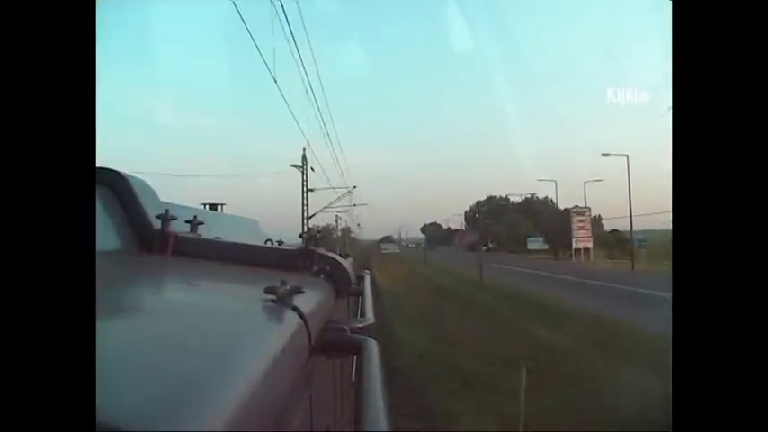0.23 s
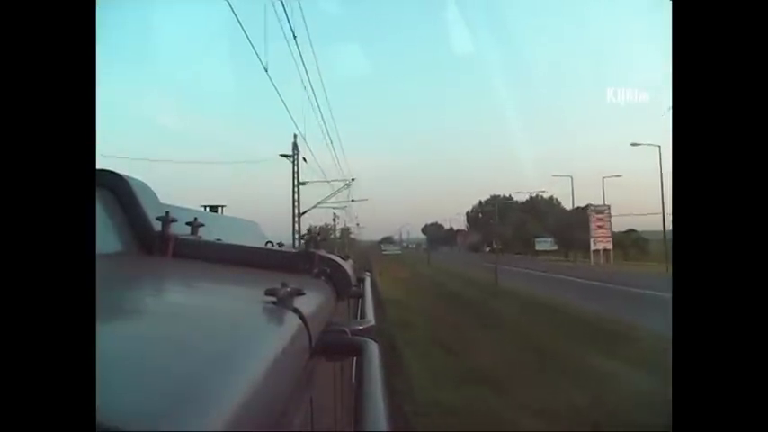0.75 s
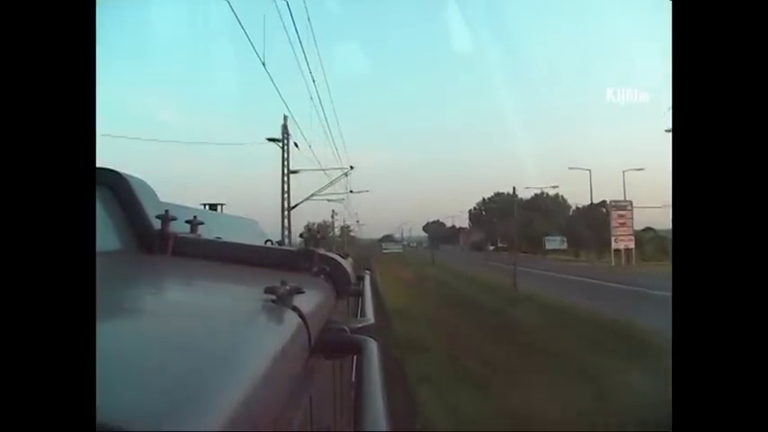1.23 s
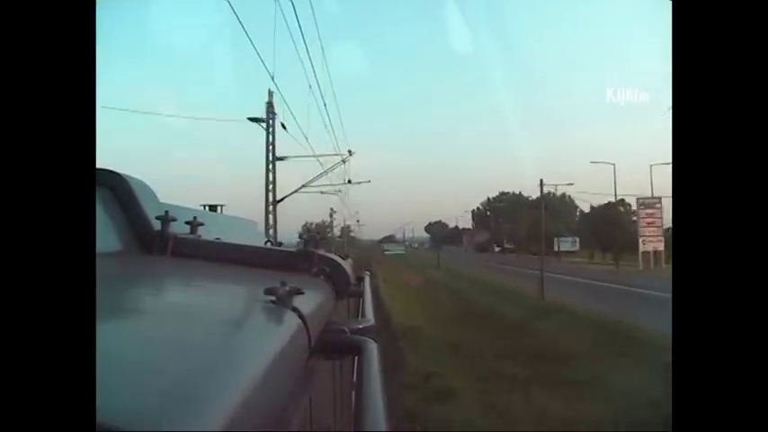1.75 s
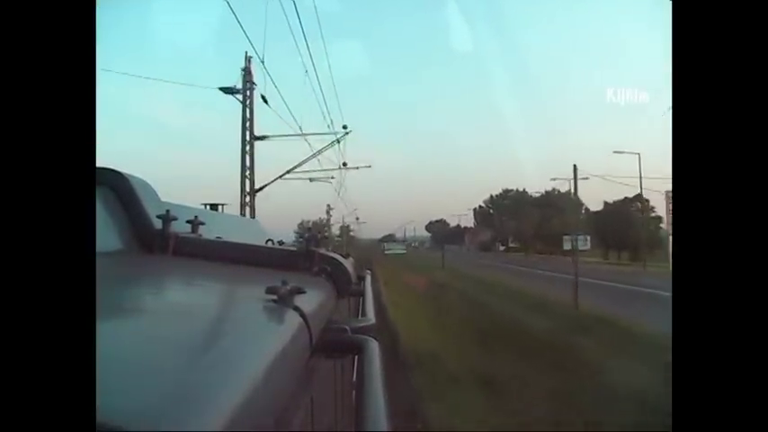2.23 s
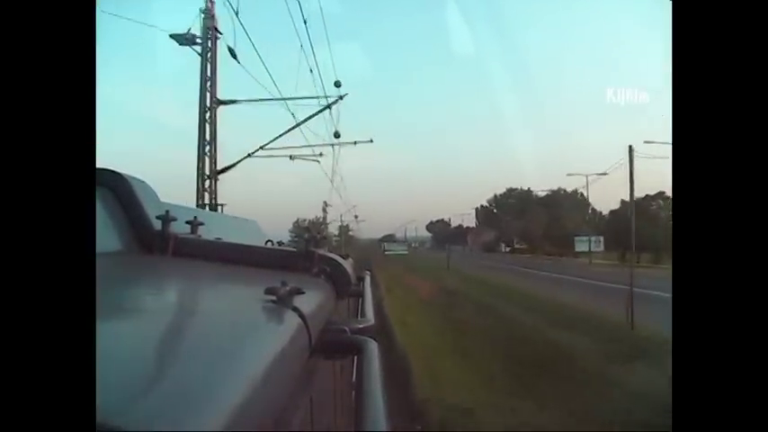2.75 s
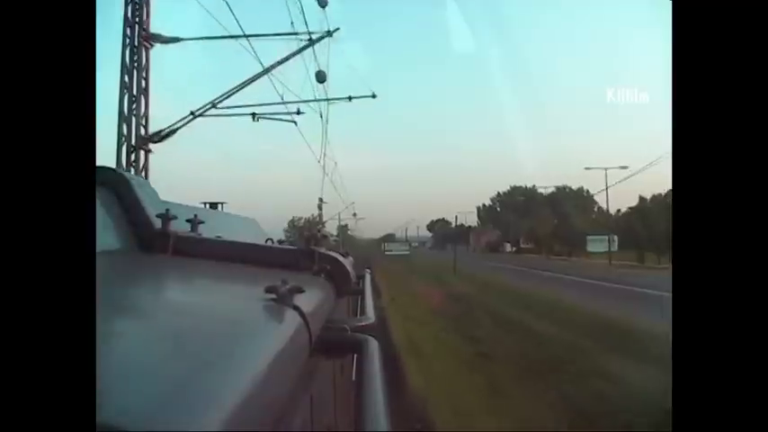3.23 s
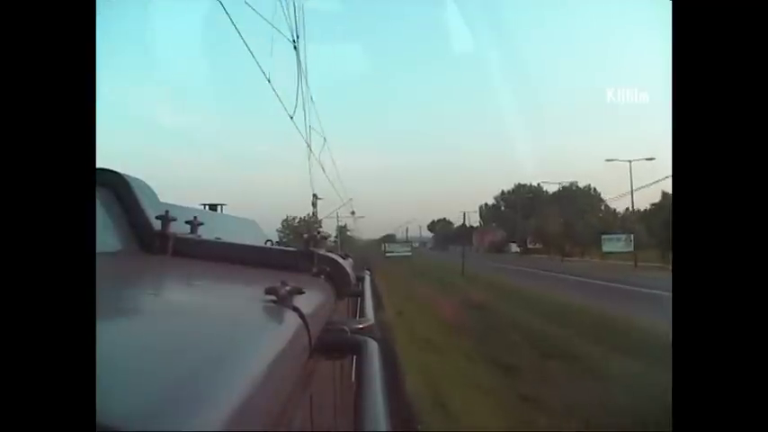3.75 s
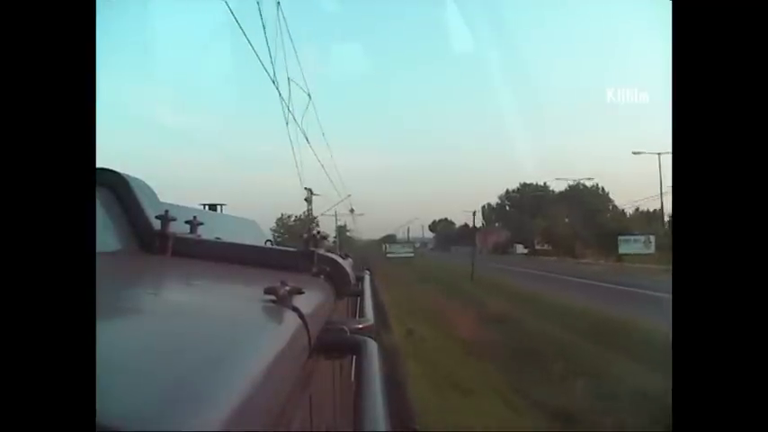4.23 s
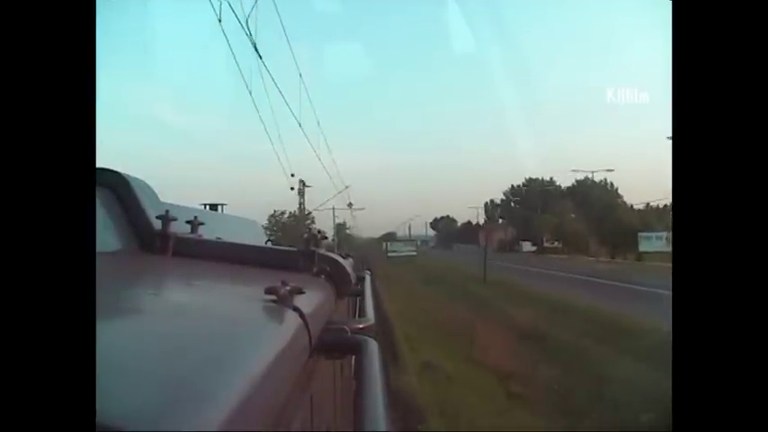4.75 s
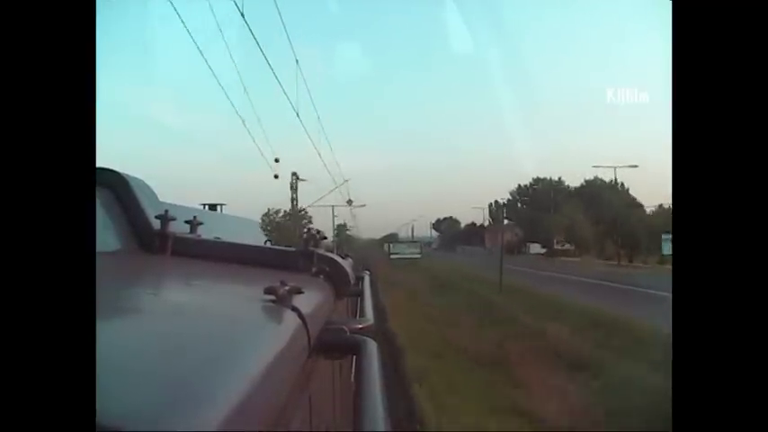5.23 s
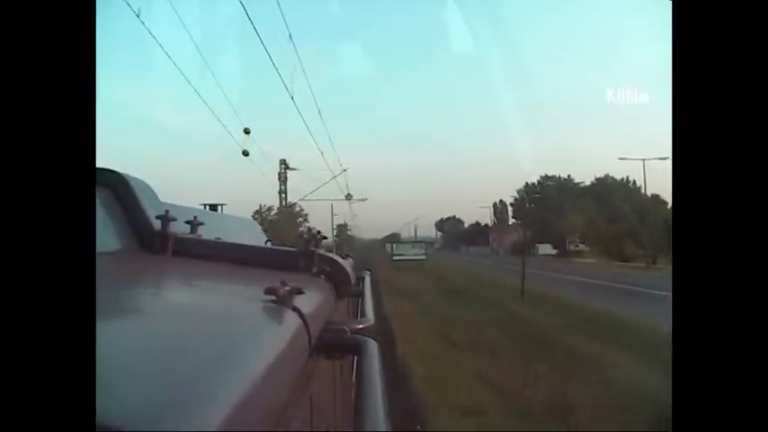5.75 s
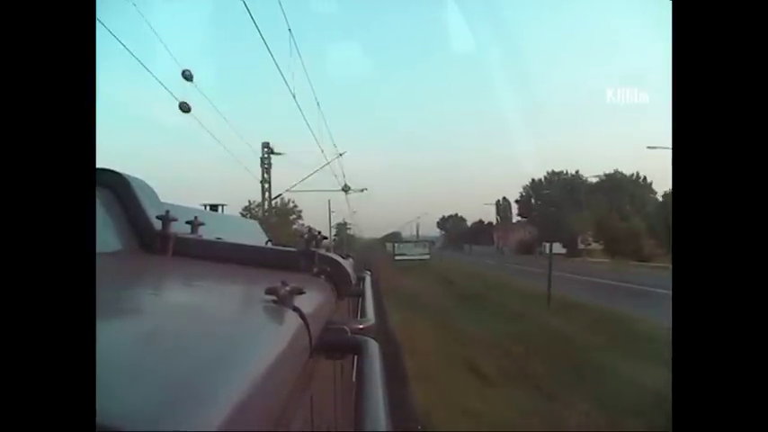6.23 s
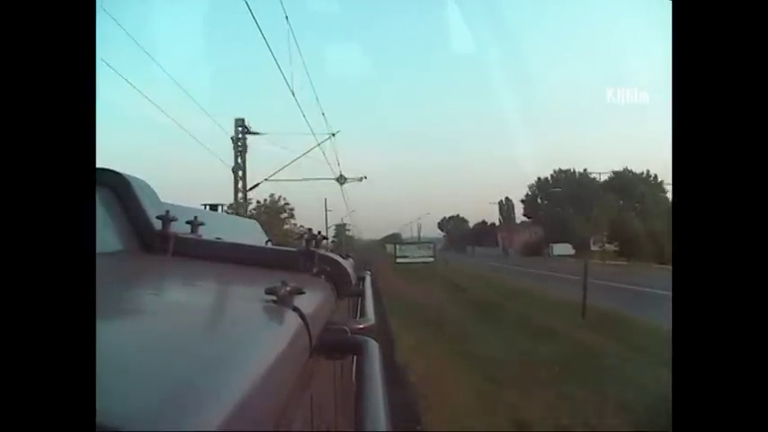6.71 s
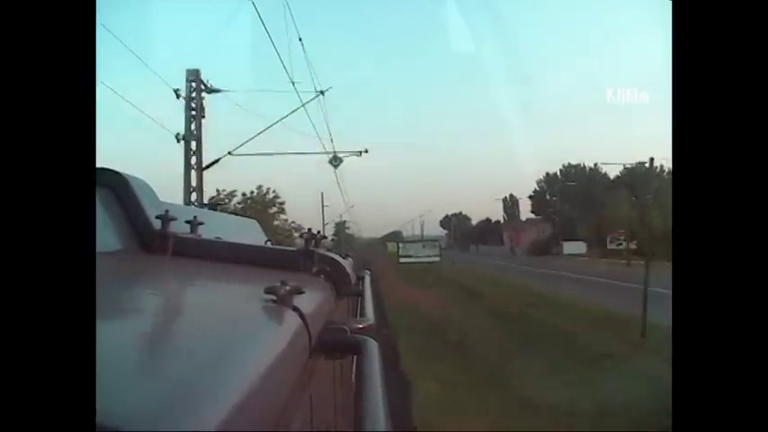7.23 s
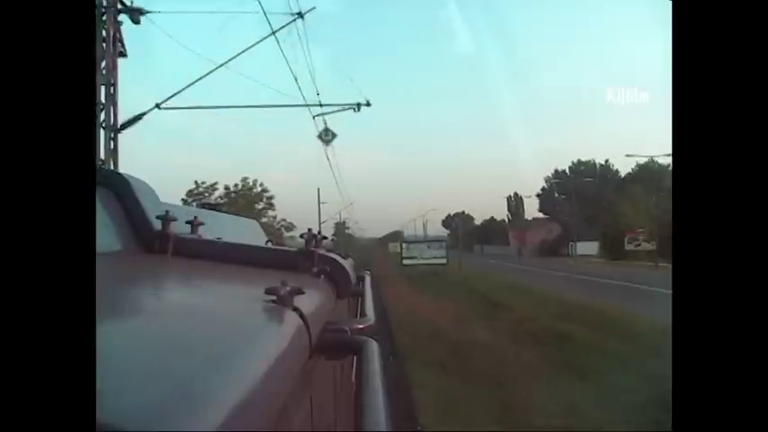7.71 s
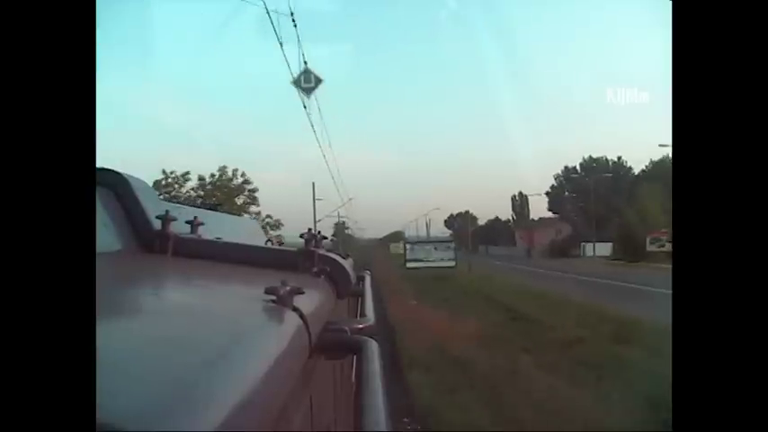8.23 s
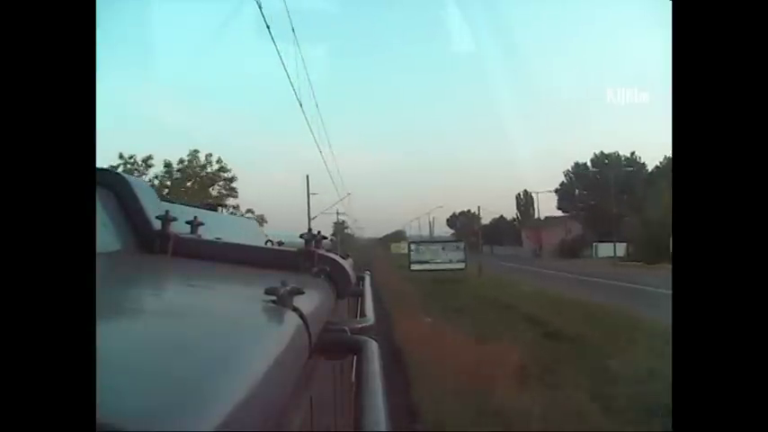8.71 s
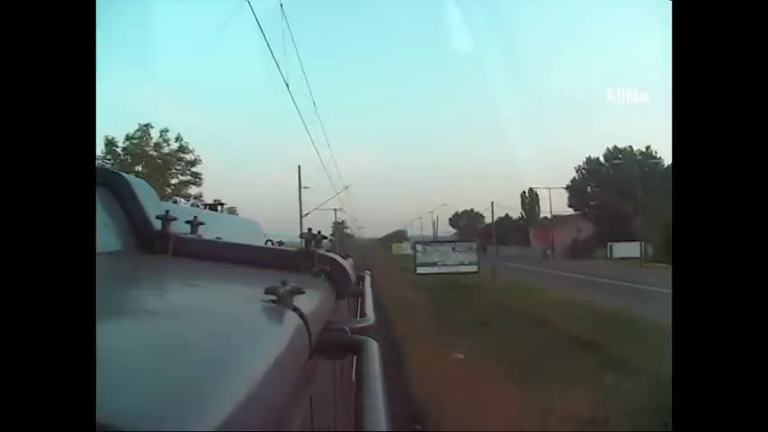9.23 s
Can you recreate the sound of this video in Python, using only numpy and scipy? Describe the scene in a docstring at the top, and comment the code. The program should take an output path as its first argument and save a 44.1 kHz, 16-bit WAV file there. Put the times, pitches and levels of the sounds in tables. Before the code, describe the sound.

A locomotive runs along the track, heard close up from the cab. Its engine drones steadily under a high, wavering generator whine, while a gear whine creeps upward as the train gathers speed. Deep rumble and rolling hiss continue throughout. From about a third of the way in, the wheels patter and thud more heavily on the rails, and loose fittings give faint, brief rattles.

```python
"""A locomotive gathers speed

From an open cab window, a diesel engine drones and its generator whines. Both follow
the engine's shaft, which runs too fast for a moment and then settles. The gears that
drive the wheels whine higher as the train speeds up. Wheels thud on the rails over
rumble, drumming, rolling hiss and cooling air, and loose fittings rattle now and then."""
import sys
import numpy as np
from scipy import signal
from scipy.fft import rfft, irfft, next_fast_len
from scipy.io import wavfile

SR = 44100
rng = np.random.default_rng(int(sys.argv[2]) if len(sys.argv) > 2 else 0)


def generate_wav(signal):
    """Clip the signal to [-1, 1] and save it as 16-bit WAV at the path in sys.argv[1]."""
    frames = np.transpose(np.atleast_2d(signal))
    scaled = np.clip(frames, -1, 1) * 32767
    pcm = np.round(scaled).astype(np.int16)
    wavfile.write(sys.argv[1], SR, pcm)


N = 417627
MARGIN = 2000  # spare samples at each end, so the sound starts and stops in full flow
SAMPLES = np.arange(-MARGIN, N + MARGIN)
STEPS = np.arange(-MARGIN, N + MARGIN + 100, 100)  # slow changes need only every 100th sample
STEP_S = STEPS / SR
FFT_SIZE = next_fast_len(N + 8192)
BIN_HZ = np.maximum(np.arange(FFT_SIZE // 2 + 1) * SR / FFT_SIZE, 1)


def from_db(db):
    """Turn decibels into a number to multiply by."""
    return 10 ** (np.asarray(db) / 20)


def per_sample(slow):
    """Fill in a slow curve so that every sample has a value."""
    return np.interp(SAMPLES, STEPS, slow)


def over_time(rows):
    """Join (time, value) points into a slow curve."""
    times_s, values = np.transpose(rows)
    return np.interp(STEP_S, times_s, values)


def over_pitch(rows):
    """Join (pitch, values...) points into one curve over pitch for each value column."""
    pitch_hz, *columns = np.transpose(rows)
    return [np.interp(np.log(BIN_HZ), np.log(pitch_hz), column) for column in columns]


def bumps(place, rows):
    """Add up smooth hills and dips along time or pitch."""
    return sum(height * np.exp(-(2 * (place - centre) / width) ** 2) for centre, width, height in rows)


def drift(rate_hz):
    """A smooth random wander, usually between about -1 and 1."""
    pole = np.exp(-200 * np.pi * rate_hz / SR)
    noise = rng.standard_normal(len(STEPS) + 1000)
    slow = signal.lfilter([1], [1, -2 * pole, pole * pole], noise)[1000:]
    return (slow - slow.mean()) / slow.std()


def tone(cycles, level_db, shift_cycles):
    """A pure tone that follows a running count of cycles."""
    return per_sample(np.sqrt(2) * from_db(level_db)) * np.sin(2 * np.pi * (cycles + shift_cycles))


def shaft_speed():
    """Shaft turns per second: the governor (speed control) overshoots, then sags to its setting."""
    set_speed, settle_s = 12.501, 1.12
    lurch_fade_s, lurch_delay_s, lurch_period_s = .3015, .244, 2.414
    excess = 1.098 * np.exp(-STEP_S / settle_s)
    swing = np.cos(2 * np.pi * (STEP_S - lurch_delay_s) / lurch_period_s)
    lurch = 1.25 * np.exp(-STEP_S / lurch_fade_s) * swing
    return set_speed + excess - lurch


# Engine tones, low from firing, higher from valves and generator: cycles_per_turn, level_db
ENGINE_TONES = [(3.0, -44.2), (4.5, -26.8), (5.0, -34.7), (6.0, -20.5), (9.0, -30.1), (11.0, -32.0),
                (13.0, -28.8), (14.0, -29.8), (15.0, -29.1), (16.0, -29.5), (19.0, -32.2), (20.0, -34.4),
                (24.0, -34.4), (32.0, -42.8), (35.0, -42.8), (36.0, -42.3), (38.0, -45.9), (46.0, -44.1),
                (48.0, -40.8), (52.0, -40.2), (54.0, -45.9), (55.0, -43.5), (56.0, -46.3), (59.0, -46.1),
                (60.0, -48.3), (70.0, -50.4), (96.0, -49.1), (117.0, -54.3), (124.0, -51.4), (154, -49)]


def engine_drone(turns):
    """Tones locked to the turning shaft; the low firing tones hold steadier than the high ones."""
    drone = np.zeros(len(turns))
    for per_turn, level_db in ENGINE_TONES:
        waver_db = 1 if per_turn < 13 else 2
        drone += tone(per_turn * turns, level_db + waver_db * drift(1), rng.random())
    return drone


# Narrow bands where the cab boosts or dulls a gliding whine: pitch_hz, width_hz, boost_db
CAB_BANDS = [(338, 5, 2), (961, 2.5, -4), (966, 4, 1.5), (977, 3, -9), (981, 2, 0), (985, 3, -12),
             (991.5, 4, -10), (995.5, 2.5, -14), (1278, 4, 4), (1282, 4, 4.5), (1289, 6, -12),
             (1296, 8, -11), (1300, 5, -7), (1304, 3, -1), (1313, 10, 1), (1327, 8, -3), (1360, 12, -8),
             (1380, 14, 4), (1792, 30, 7), (1928, 5, 8), (1950, 9, 10), (1970, 14, 11), (1986, 16, 18),
             (2002, 8, 10), (2258, 32, 18), (3403, 36, 17)]
# The generator's slot whine, its overtones and fainter whistles: cycles_per_turn
SLOT_TONES = (130, 134, 138, 142, 146, 272, 276, 280, 284, 366.1, 414, 418, 406, 410, 430, 434, 442, 150)
# How loud each slot tone usually is: level_db
SLOT_LEVELS = (-45, -40, -36.5, -36, -42.5, -59.5, -51, -53, -52, -63, -68, -68, -76, -72, -78, -78, -78,
               -49)
# When slot tones swell or sink, one list for each tone: middle_s, length_s, boost_db
SLOT_CHANGES = [
    [(1.2, .6, 3), (4.9, 0.73, 7.5), (6.2, 0.6, 10), (7.6, .8, 9), (9.0, 0.76, 9.5)],
    [(1.9, 0.29, 12), (3.9, 0.95, 11), (4.9, 0.77, 7.5), (7.5, 0.42, 10)],
    [(.3, 0.19, 8), (.75, 0.31, 4), (1.3, 0.31, 9), (2, 0.32, 4), (4.3, 1.1, 5), (5.4, 1.4, -2),
     (7.1, 1, 4.5), (8.3, 0.9, 8), (8.8, 0.34, -19), (9.2, 0.35, 5)],
    [(.05, 0.24, 2), (1.2, 0.6, 3.5), (4.5, 0.53, -8), (8.4, 0.81, -7), (9.2, 0.39, 6.5)],
    [(0, 0.23, 12.5), (1, 1, 2), (2.4, 1.1, 8), (3.9, 1.1, 6), (4.8, .5, -4), (6, 0.71, -8), (8.1, .9, 8.5)],
    [(1.7, .5, 11), (3.4, .5, 7), (7.4, 0.4, -4.5)],
    [(.25, 0.73, 8), (2.8, 0.95, 2), (4.6, 1, 7), (7.5, .6, 3), (8.5, 0.63, 3.5)],
    [(.1, 0.33, 8), (3, 0.92, -6), (8.5, 0.46, 3), (9.2, 0.47, 11.5)],
    [(.5, 1.5, -8), (5.5, 0.55, -4), (6.8, 0.46, -10), (9, 0.55, 7.5)],
    [(3.6, 0.62, 8), (4.4, 0.62, -6), (6.4, 3.3, 11), (8.6, 1, -8.5), (9.3, 0.42, 10)],
    [(4.5, .8, -11), (7.5, 4, 10)],
    [(.7, .6, 9), (2.1, .6, 9), (4.4, .8, 9), (7.1, 0.95, 6)],
    [(1.9, .4, 10), (8.2, 2.5, 11)],
    [(.7, .4, 11), (1.5, .4, 12), (4, 1.5, 8)],
    [(1.17, .25, 22), (1.75, 0.22, 15)],
    [(.45, 0.27, 22), (.72, 0.22, 12)],
    [(.8, .25, 20)],
    [(.6, 1.1, 0), (3.6, 1.6, 3.5), (7.2, .6, 5), (8.5, 0.88, 7)],
]
# When overtones in the housing swell or sink together: middle_s, length_s, boost_db
HOUSING_CHANGES = [(0.097, 0.44, 0), (.65, 0.65, -6.5), (1.95, 0.29, -6), (3.0, 2, 6), (3.9, .2, 0),
                   (5.2, .3, 1), (7.3, .25, -5)]
# Side tones about an octave above the slot whine: cycles_per_turn, level_db
HOUSING_TONES = [(264, -54), (268, -50), (288, -53), (292, -62), (300, -54)]


def generator_whine(turns, turns_per_s):
    """The generator's slots make close tones, loosely in step, that buzz four times a turn."""
    whine = np.zeros(len(turns))
    together_db = bumps(STEP_S, HOUSING_CHANGES)
    for per_turn, usual_db, swells in zip(SLOT_TONES, SLOT_LEVELS, SLOT_CHANGES):
        level_db = usual_db + bumps(per_turn * turns_per_s, CAB_BANDS) + bumps(STEP_S, swells)
        if 275 < per_turn < 300:
            level_db += together_db
        waver_db = 1.8 if per_turn > 300 else 1.7 if per_turn > 200 else .9
        level_db += waver_db * drift(4)
        whine += tone(per_turn * turns, level_db, shift_cycles=per_sample(.12 * drift(.32)))
    housing_hz, width_hz = 3505, 300  # side tones are loudest where the housing rings
    for per_turn, usual_db in HOUSING_TONES:
        off_centre = 2 * (per_turn * turns_per_s - housing_hz) / width_hz
        housing_db = together_db - 10 * np.log10(1 + off_centre ** 4)
        whine += tone(per_turn * turns, usual_db - 4 + housing_db + 2.5 * drift(.92), rng.random())
    return whine


# Low hums and thin generator and blower whistles: cycles_per_turn, start_db, end_db
LOAD_TONES = [(12, -20.5, -24.5), (21, -35, -24.5), (29, -41, -32), (27, -30, -28.5), (64, -45, -40),
              (68, -43, -40), (140, -58, -46), (557.3, -70, -78), (594.7, -70, -64), (637.1, -65, -76),
              (661, -68, -68), (689.8, -69, -72)]


def hums_and_whistles(turns, turns_per_s):
    """Tones that follow the shaft and swell or fade as the engine takes up the load."""
    sound = np.zeros(len(turns))
    for per_turn, start_db, end_db in LOAD_TONES:
        level_db = np.linspace(start_db, end_db, len(STEPS)) + bumps(per_turn * turns_per_s, CAB_BANDS)
        waver_db = .9 if per_turn < 30 else 2.8
        sound += tone(per_turn * turns, level_db + waver_db * drift(.8), rng.random())
    return sound


# The main gear tones: cycles_per_tooth
GEAR_TONES = (.75366, 1, 1.50754, 1.70045)
# How loud each main gear tone usually is: level_db
GEAR_LEVELS = (-30.5, -27.5, -50.5, -57.5)
# Fainter gear tones: cycles_per_tooth, start_db, end_db
FAINT_GEAR_TONES = [(.7275, -50, -50), (.7796, -44, -43), (1.0290, -42, -54), (1.0492, -42, -44),
                    (1.457, -52, -52), (1.9997, -57, -57), (2.0985, -60, -60), (2.2610, -61, -61)]


def gear_whine():
    """Gear teeth meet faster as the train speeds up, so their whine slowly climbs."""
    start_hz, climb_hz_per_s = 1271.4, 5.964
    tooth_hz = start_hz + climb_hz_per_s * STEP_S
    teeth = np.cumsum(per_sample(tooth_hz + .6 * drift(3))) / SR
    levels_db = [usual_db + bumps(per_tooth * tooth_hz, CAB_BANDS)
                 for per_tooth, usual_db in zip(GEAR_TONES, GEAR_LEVELS)]
    whine = np.zeros(len(teeth))
    for per_tooth, level_db in zip(GEAR_TONES, levels_db):
        waver_db = 1.2 if per_tooth < 1 else .8
        whine += tone(per_tooth * teeth, level_db + waver_db * drift(5), rng.random())
    whine += tone(3 * teeth, levels_db[2] - 15, rng.random())  # grows with the third main tone
    for per_tooth, start_db, end_db in FAINT_GEAR_TONES:
        level_db = np.linspace(start_db, end_db, len(STEPS)) + 1
        level_db += bumps(per_tooth * tooth_hz, CAB_BANDS)
        whine += tone(per_tooth * teeth, level_db + 2.5 * drift(.27), rng.random())
    return whine


# How loud the patter of the wheels is: time_s, level_db
PATTER_LEVELS = [(0, -37), (.7, -34), (1.4, -44), (2.3, -30), (3.2, -27), (3.7, -19.5), (4.8, -24),
                 (6.3, -19), (7.6, -24.5), (9.47, -27.5)]
# Heavier single blows of a wheel on the rail: start_s, strength_db
WHEEL_JOLTS = [(3.593, -15), (4.017, -15), (4.545, -21), (4.952, -21), (5.234, -18), (5.538, -18),
               (6.094, -16.5), (7.074, -22)]
# Notes of the frame that holds the wheels: pitch_hz, level_db, ring_s (time to fade by 60 dB)
FRAME_NOTES = [(179, -3.5, 0.095), (211.7, 4.5, 0.1), (232.2, -6, 0.27), (233, -13.5, 0.027),
               (358, -15, 0.15)]


def wheel_thuds(blows_per_s=60, spread_db=1.5):
    """Wheels meet rough spots at random and sometimes take a jolt; each blow rings their frame."""
    count = len(SAMPLES)
    blows, ringing = np.zeros((2, 2, count))  # in each, row 0 is the patter and row 1 the jolts
    rough_spots = rng.random(count) < blows_per_s / SR
    blows[0] = rough_spots * from_db(spread_db * np.minimum(rng.exponential(1, count), 4))
    start_s, strength_db = np.transpose(WHEEL_JOLTS)
    blows[1, (start_s * SR).astype(int) + MARGIN] = from_db(strength_db)
    for pitch_hz, level_db, ring_s in FRAME_NOTES:
        fade, angle = from_db(-60 / (ring_s * SR)), 2 * np.pi * pitch_hz / SR
        unevenness = 1 + [[.64], [.15]] * rng.standard_normal(count)
        strikes = blows * unevenness * from_db(level_db) + 1e-18
        ringing += signal.lfilter([0, np.sin(angle)], [1, -2 * fade * np.cos(angle), fade ** 2], strikes)
    patter, jolts = signal.sosfilt(signal.butter(2, [120, 420], "band", fs=SR, output="sos"), ringing)
    return patter / patter.std() * per_sample(from_db(over_time(PATTER_LEVELS))) + jolts


# Where the locomotive's panels and ducts ring: pitch_hz, width_hz, boost_db
PANEL_RINGS = [(347.3, 51, 8.5), (468, 19, 5.5), (619.4, 93, 9.5), (710, 8.6, -2), (1298, 195, 6.5),
               (1755, 230, 3), (1943, 435, 8.5), (2932, 110, 4), (3406, 160, 5.5)]


def panel_noise(shape, level_db, flicker_db, flicker_hz):
    """Two separate flickering noises with the given tone shape, ringing in panels and ducts."""
    shape_db = over_pitch(shape)[0]
    for pitch_hz, width_hz, boost_db in PANEL_RINGS:
        shape_db += boost_db / (1 + (2 * (BIN_HZ - pitch_hz) / width_hz) ** 2)
    white = rfft(rng.standard_normal((2, FFT_SIZE)))
    pair = irfft(white * from_db(shape_db), FFT_SIZE)[:, :len(SAMPLES)]
    return pair / pair.std() * per_sample(from_db(level_db + flicker_db * drift(flicker_hz)))


# Tone shape of the deep rumble: pitch_hz, relative_db
RUMBLE_SHAPE = [(20, -26), (40, -14), (60, -8), (95, -5), (200, 0), (300, -7), (420, -14), (600, -30),
                (2000, -90)]
# Tone shape of the drumming above it: pitch_hz, relative_db
DRUMMING_SHAPE = [(300, -20), (420, -6), (520, -6.7), (700, -6.7), (850, -11.5), (1100, -10.5), (1500, -17),
                  (2150, -23), (2400, -30), (6000, -90)]


def rumble_and_drumming():
    """The moving locomotive's deep noise, with a higher one that flickers faster."""
    rumble = panel_noise(RUMBLE_SHAPE, level_db=-18, flicker_db=1, flicker_hz=3.1)
    drumming = panel_noise(DRUMMING_SHAPE, level_db=-22.5, flicker_db=.7, flicker_hz=8.7)
    return rumble + drumming


# Tone shape of the rolling hiss: pitch_hz, relative_db
HISS_SHAPE = [(1500, -15), (2350, -4), (2700, -1), (3000, -2.5), (4000, -8), (5000, -11.5), (5700, -14),
              (6500, -25), (12000, -70)]
# How loud the hiss is: time_s, level_db
HISS_LEVELS = [(0, -35.5), (.9, -38), (2.3, -36.5), (2.85, -38), (3.4, -34), (4.3, -36.5), (6.3, -35),
               (8.7, -36), (9.47, -34)]


def rolling_hiss():
    """Wheels rolling on the rails make a hiss that gently swells and sinks."""
    return panel_noise(HISS_SHAPE, over_time(HISS_LEVELS), flicker_db=1, flicker_hz=9)


# Tone shape of the cooling air: pitch_hz, relative_db
AIR_SHAPE = [(2500, -40), (4500, -8), (6500, -2), (8700, 0), (10000, -8), (11500, -15), (13000, -19),
             (14500, -19)]


def cooling_air():
    """A steady flow of cooling air makes a faint, very high rush."""
    return panel_noise(AIR_SHAPE, level_db=-51.5, flicker_db=.9, flicker_hz=9)


# When loose fittings rattle: middle_s, length_s, level_db
RATTLE_BURSTS = [(2.85, .04, -58), (3.68, .06, -50), (4.17, .05, -56), (4.76, .06, -52), (4.925, .05, -52),
                 (6.3, .05, -52), (6.87, .05, -56), (7.51, .05, -54), (8.5, .05, -56), (8.77, .05, -55),
                 (8.91, .04, -55), (8.975, .05, -51), (9.29, .06, -55)]


def rattles(ticks_per_s=1500, band_hz=(4200, 10500)):
    """Loose fittings shake in short runs of tiny bright ticks."""
    ticks = (rng.random(len(SAMPLES)) < ticks_per_s / SR) * rng.standard_normal(len(SAMPLES))
    ticks = signal.sosfilt(signal.butter(2, band_hz, "band", fs=SR, output="sos"), ticks)
    bursts = [(middle_s, length_s, from_db(level_db)) for middle_s, length_s, level_db in RATTLE_BURSTS]
    return ticks / ticks.std() * per_sample(bumps(STEP_S, bursts))


def spectrum_of(sound):
    """Split a sound into its pitches, after fading its spare ends."""
    return rfft(sound * signal.windows.tukey(len(sound), MARGIN / len(sound)), FFT_SIZE)


# The right side compared with the left: pitch_hz, level_db, lag_radians, likeness (0 to 1)
RIGHT_SIDE = [(40, -9.4, -2.7, .97), (75, -9, -2.2, .99), (130, -5.7, -1.4, .99), (230, -2.3, -.85, .96),
              (400, -.6, -.5, .8), (600, -3.3, -.5, .78), (1000, -1.6, -.4, .74), (1300, -1.1, .35, .76),
              (1750, -2.2, -.1, .8), (2500, -.9, .35, .86), (3800, -.7, .65, .76), (6500, -.5, 1.3, .4),
              (8500, -.9, 2, .45), (12000, -.3, 3, .66)]


def scene():
    """Tones, thuds and rattles reach both sides; noise is scattered, so the right has some of its own."""
    turns_per_s = shaft_speed()
    turns = np.cumsum(per_sample(turns_per_s)) / SR
    direct = (engine_drone(turns) + generator_whine(turns, turns_per_s)
              + hums_and_whistles(turns, turns_per_s) + gear_whine() + wheel_thuds() + rattles())
    left_noise, own_noise = rumble_and_drumming() + rolling_hiss() + cooling_air()
    right_db, lag_radians, likeness = over_pitch(RIGHT_SIDE)
    right_noise = likeness * spectrum_of(left_noise) + np.sqrt(1 - likeness ** 2) * spectrum_of(own_noise)
    right_spectrum = (spectrum_of(direct) + right_noise) * from_db(right_db) * np.exp(-1j * lag_radians)
    right = irfft(right_spectrum, FFT_SIZE)[:len(SAMPLES)]
    return np.array([direct + left_noise, right])[:, MARGIN:MARGIN + N]


def record(dry):
    """Shift the wave slightly off zero, round its tallest peaks and cut the highest treble."""
    offset, cutoff_hz = .0065, 14250
    shifted = dry + offset
    rounded = shifted / (1 + shifted ** 12) ** (1 / 12)
    return signal.sosfilt(signal.ellip(10, .5, 50, cutoff_hz, fs=SR, output="sos"), rounded)


dry = scene()
out = record(dry)
generate_wav(out)
```